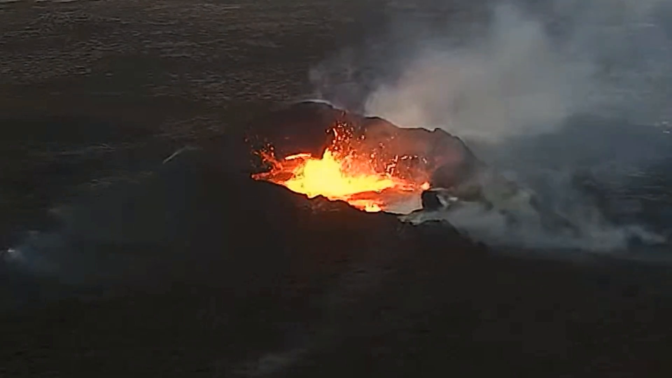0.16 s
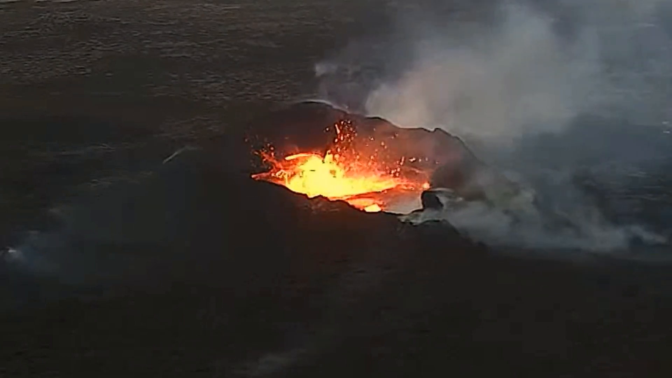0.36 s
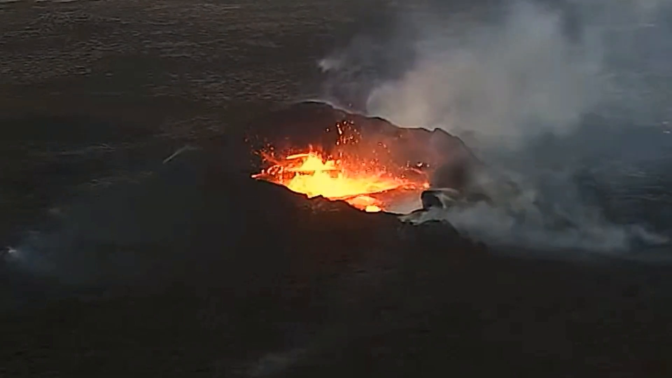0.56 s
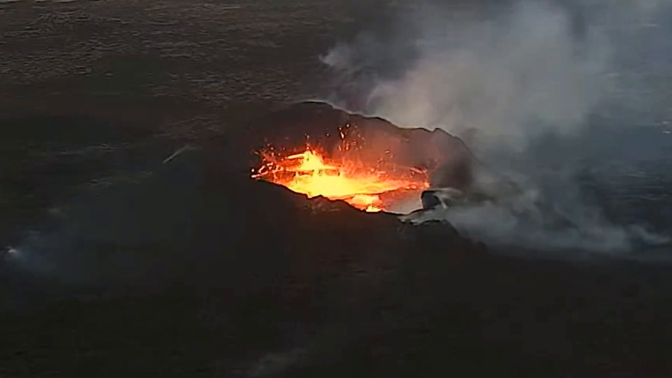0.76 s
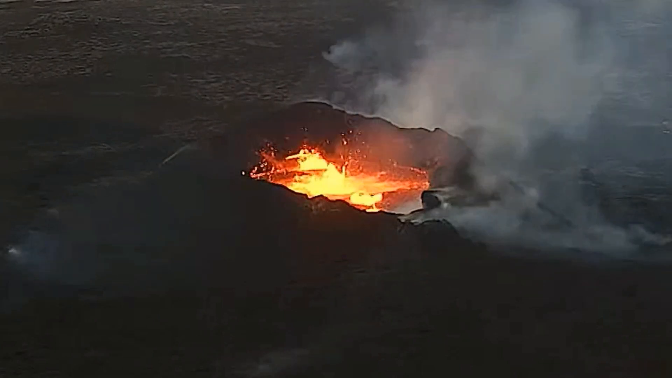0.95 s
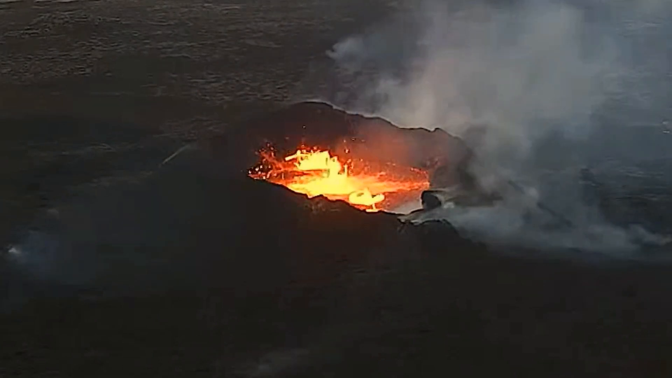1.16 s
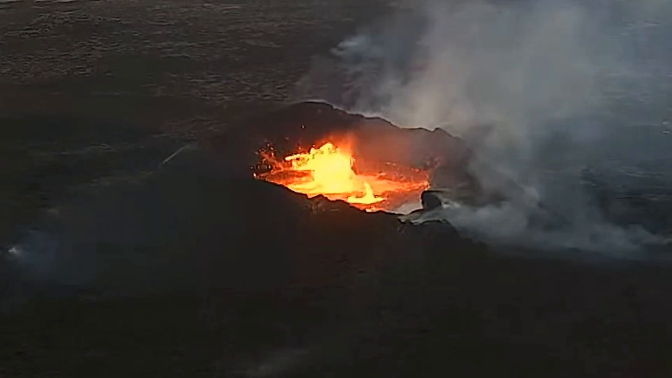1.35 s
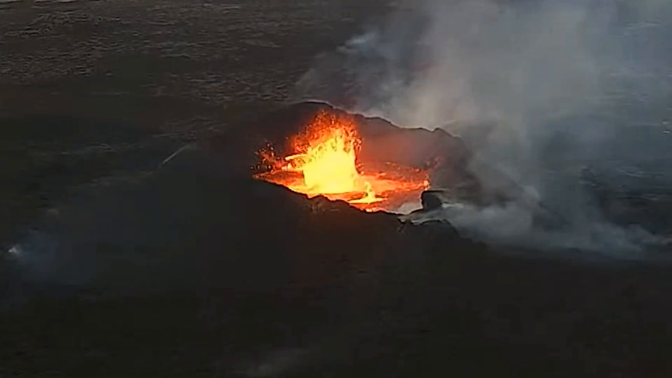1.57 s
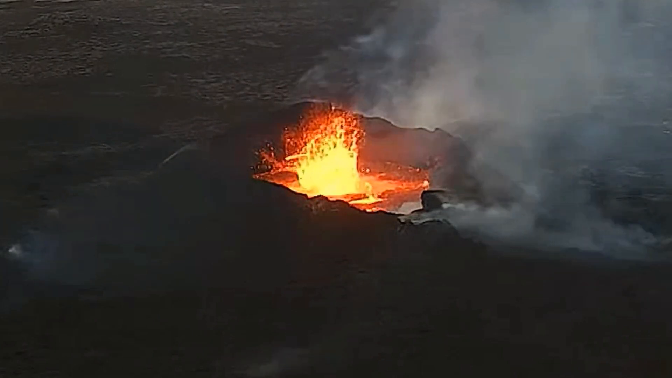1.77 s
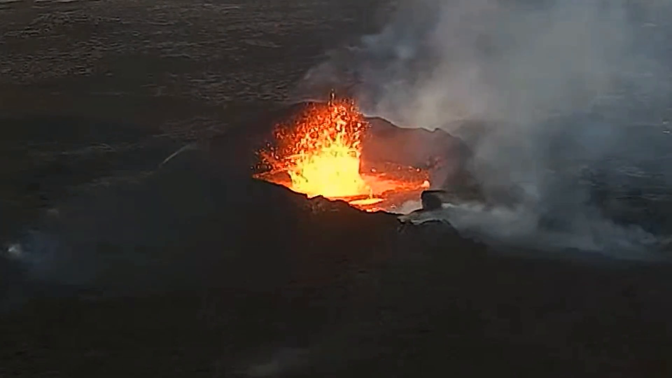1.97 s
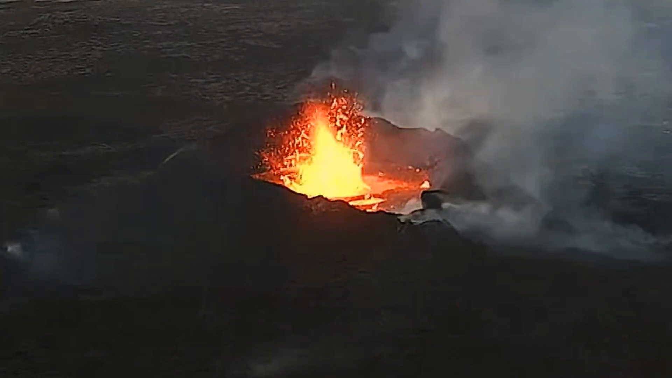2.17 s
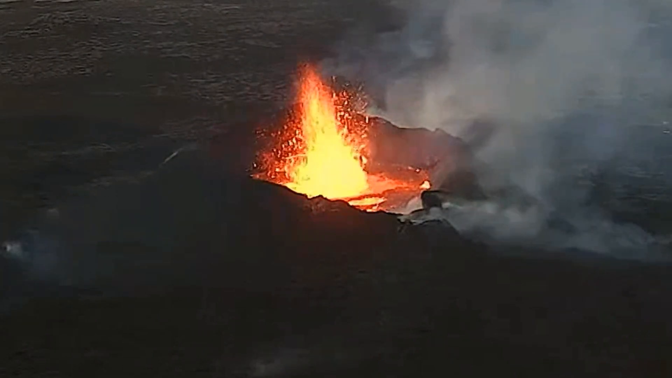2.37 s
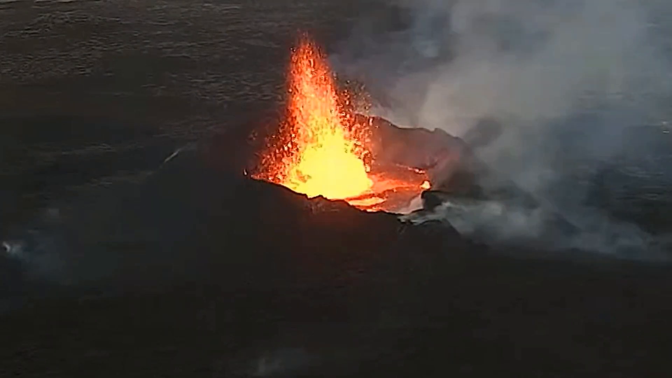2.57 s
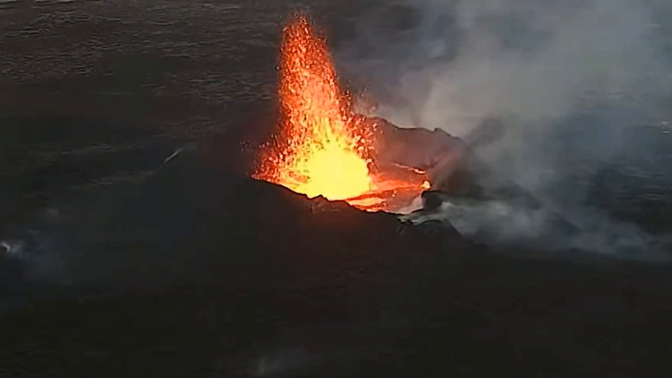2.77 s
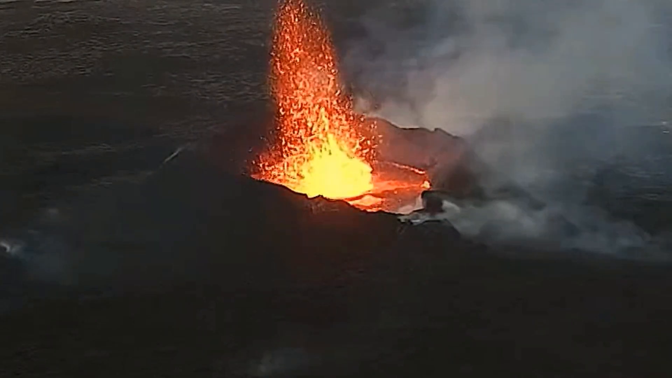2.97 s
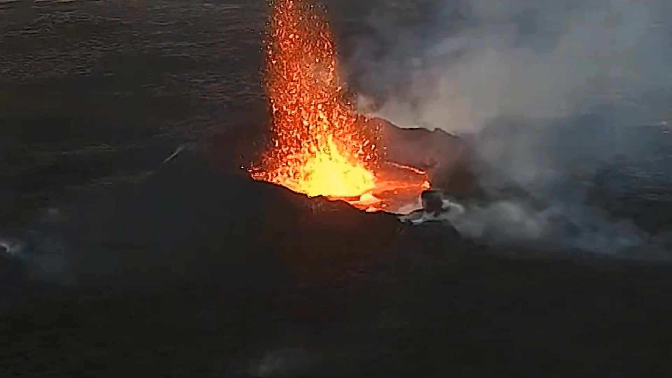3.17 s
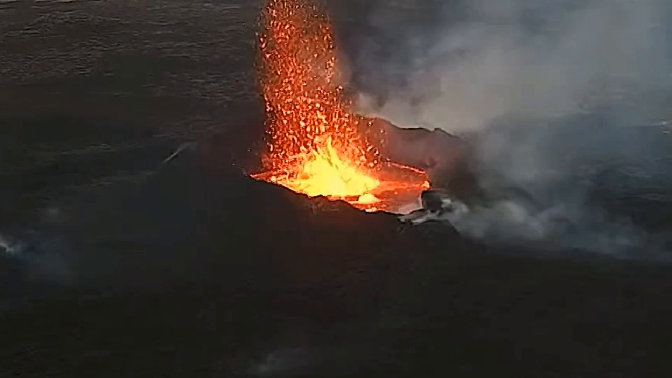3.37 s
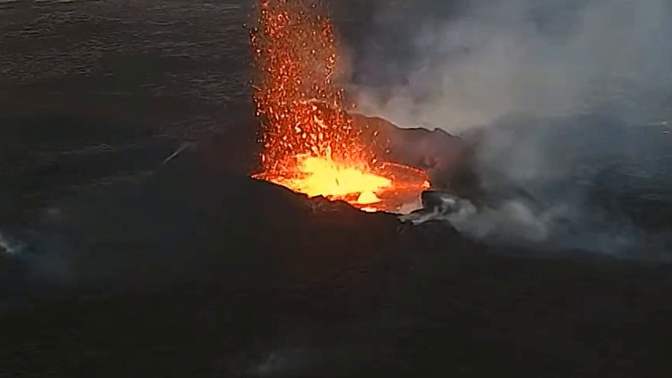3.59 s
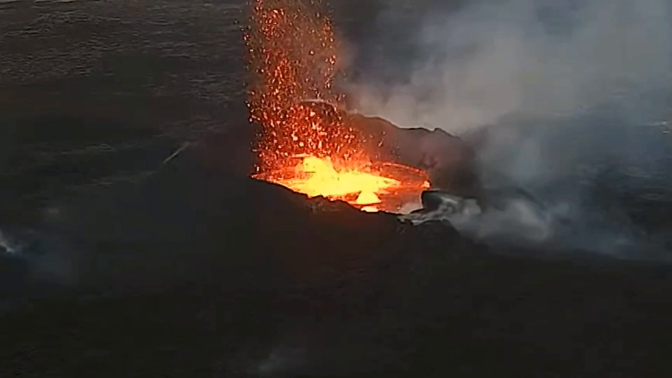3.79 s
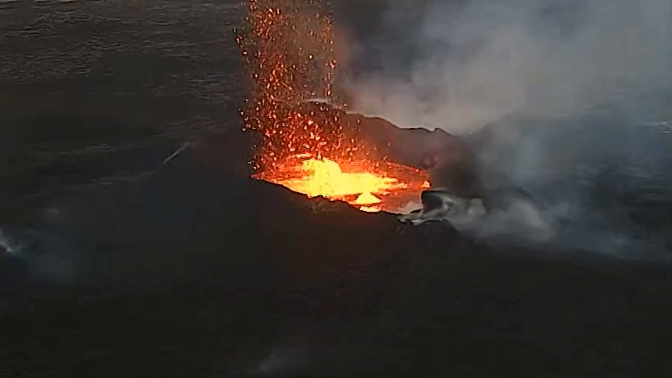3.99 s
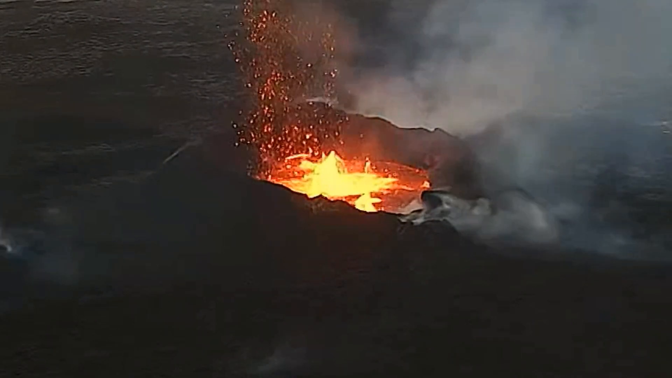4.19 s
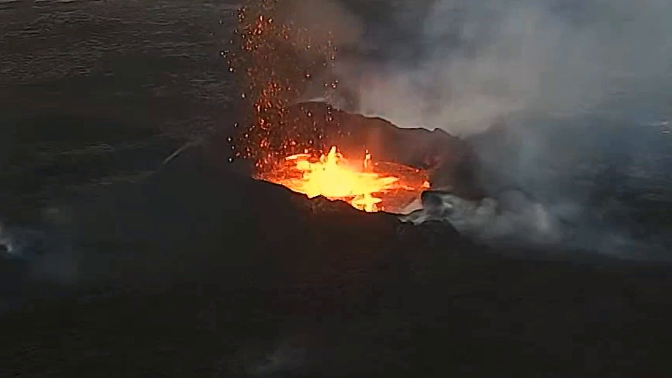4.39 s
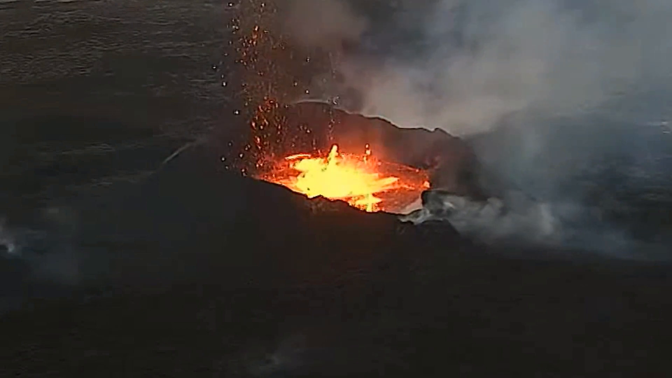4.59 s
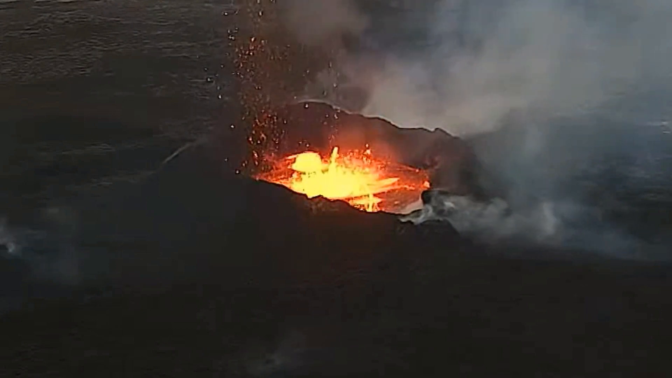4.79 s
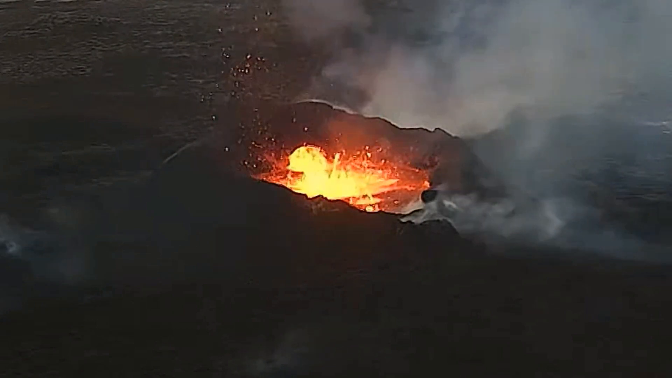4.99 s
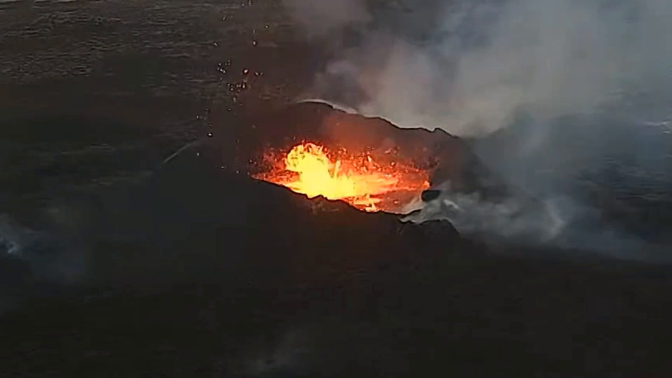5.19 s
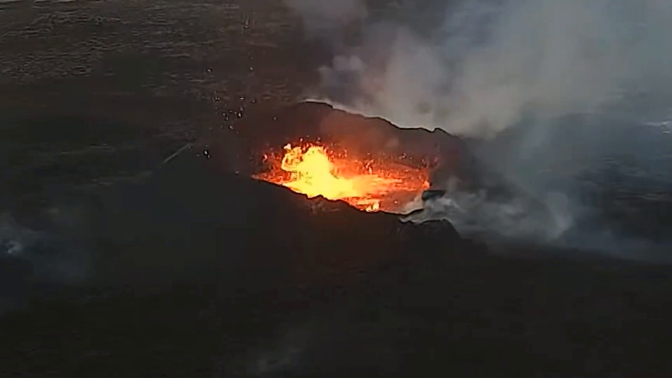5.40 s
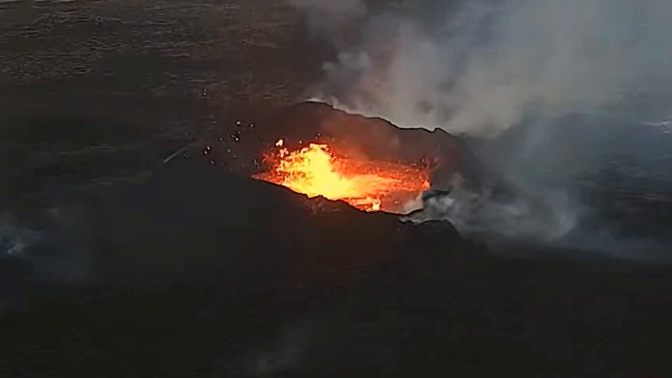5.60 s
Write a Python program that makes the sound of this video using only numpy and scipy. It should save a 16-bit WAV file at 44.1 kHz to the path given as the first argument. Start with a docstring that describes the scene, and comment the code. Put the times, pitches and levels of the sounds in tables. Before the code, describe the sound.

A lava lake churns far away in open country, heard in wide, diffuse stereo without sharp close detail. At first a low rumble and a few soft booms lie beneath rushing wind; wavering, breathy whistles glide over it until about 1 s, with a lower howl from 0.7 to 1.2 s. From 1 s a smooth hiss and hollow gush build, peaking near 1.9 s as booms cluster and the roar climbs, fully open by 2.2 s. Dull lava slaps land around 1.9, 2.5, 3.2 and 4.1 s. The deep rumble swells, with a very low, heavy boom at 2.75 s, while the hiss slowly dies away. Faint higher whistles return at 3.2-3.9 s, and a stronger lower howl wavers from 3.4 to 4.5 s. A dull wash of falling lava builds from 3.4 to 4.2 s and stays. Frequent muffled booms, roar and wind continue until the end, about 5.6 s, as the deepest rumble recedes.

```python
"""A lava lake churns in a crater and throws up a tall fountain, far off in open country.
Its bursting gas pockets boom as short swells of noise over a heaving rumble and a roar of shaped noise.
The fountain swells as a hiss with a hollow gush just behind; lava slaps down and rains back as a dull wash.
Wind rushes over the slopes as churning noise and twice rises to a wavering whistle, made of narrow
gliding noise, with a lower howl that begins later and outlasts it."""
import sys
import numpy as np
from scipy import signal
from scipy.fft import rfft, irfft, next_fast_len
from scipy.io import wavfile
from scipy.ndimage import uniform_filter1d

SR = 44100
rng = np.random.default_rng(int(sys.argv[2]) if len(sys.argv) > 2 else 0)


def wav_record(signal):
    """Record a signal, one row per channel, as 16-bit PCM in the file named by sys.argv[1]."""
    frames = np.transpose(np.atleast_2d(signal))
    bounded = np.clip(frames, -1, 1)
    # unit amplitude maps onto the largest positive 16-bit level
    quanta = np.round(bounded * 32767).astype(np.int16)
    wavfile.write(sys.argv[1], SR, quanta)


N = 249165  # length of the scene in samples


def from_db(db):
    """Turn decibels into a gain."""
    return 10 ** (np.asarray(db) / 20)


def rms_one(x):
    """Scale a sound to an average power of one."""
    return x / np.sqrt(np.mean(x ** 2) + 1e-20)


def in_time(rows):
    """Draw straight lines between the rows of a table: one curve for each column after the time."""
    s, *columns = np.transpose(rows)
    return [np.interp(np.arange(N) / SR, s, column) for column in columns]


def at_hz(points, hz):
    """Read a spectrum table on a log-frequency axis; it is silent beyond its ends."""
    known_hz, db = np.transpose(points)
    return np.interp(np.log(hz), np.log(known_hz), db, left=-200, right=-200)


def panned(x, left_db):
    """Lean a stereo sound to the left by a level difference in dB."""
    gains = np.array([from_db(left_db / 2), from_db(-left_db / 2)])
    return x * gains.reshape(2, -1)


def add(out, start_s, sound):
    """Mix a sound in from a given time, as far as it fits."""
    start = int(start_s * SR)
    first, last = max(start, 0), min(start + sound.shape[1], N)
    out[:, first:last] += sound[:, first - start:last - start]


def drift(rate):
    """Wander slowly at random with spread 1: noise through two equal low-pass stages at rate [Hz]."""
    r = np.exp(-80 * np.pi * rate / SR)  # one step lasts 40 samples
    noise = rng.standard_normal(N // 40 + 2002)
    slow = signal.lfilter([1], [1, -2 * r, r * r], noise)[2000:]  # drop the filter's start-up
    return np.interp(np.arange(N) / 40, np.arange(len(slow)), rms_one(slow))


def turbulence(colour, churn_db, churn_rate, alike):
    """Make stereo noise of unit power; eddies of each size (half-octave bands) swell and fade alone."""
    size = next_fast_len(N, real=True)
    hz = np.maximum(np.arange(size // 2 + 1) * SR / size, 1)
    shaped = rfft(rng.standard_normal((2, size))) * from_db(at_hz(colour, hz))
    edges = 14 * 2 ** (np.arange(20) / 2)
    out = np.zeros((2, N))
    for low, high in zip(edges, edges[1:]):
        swell = from_db(churn_db * drift(churn_rate))
        if high > colour[0][0] and low < colour[-1][0]:
            band = shaped * ((hz >= low) & (hz < high))
            out += irfft(band, size)[:, :N] * swell
    alike = np.clip(alike, -1, 1)  # 0: left and right unrelated, 1: the same
    mid = np.sqrt(1 + alike) * out[0]
    side = np.sqrt(1 - alike) * out[1]
    return rms_one(np.array([mid + side, mid - side]))


def sustained(x, span_s):
    """Even out the slow power of a noise, so that later level curves set the swells."""
    power = uniform_filter1d(np.mean(x ** 2, axis=0), max(int(span_s * SR), 2))
    return x / np.sqrt(power + 1e-12)


def narrow_noise(hz, width, steady_s):
    """Make a stereo noise band that glides with hz, up to 2 s long; width is a share of the mean pitch."""
    real, imaginary = rng.standard_normal((2, 2, 2 * SR))[..., :len(hz) + SR // 20]
    low_pass = signal.butter(3, width * np.mean(hz) / 2, fs=SR, output="sos")
    eddies = signal.sosfilt(low_pass, real + 1j * imaginary)[:, -len(hz):]
    carrier = np.exp(2j * np.pi * np.cumsum(hz) / SR)  # lifts the slow noise up to the pitch
    return sustained(np.real(eddies * carrier), steady_s)


def thuds(rows, rise_s, fall_s, width):
    """Make blows blurred by distance: each is a quick swell of noise around its own pitch."""
    t = np.arange(-SR // 4, SR // 4) / SR
    swell = np.exp(-(t / np.where(t < 0, rise_s, fall_s)) ** 2)
    out = np.zeros((2, N))
    for s, hz, db in rows:
        noise = narrow_noise(np.full(len(t), hz), width, steady_s=0.08)
        add(out, s + t[0], noise * swell * from_db(db))
    return out


# Moving air, before the fixed offsets and scaling in wind():
# (time [s], rush level [dB], fine hiss level [dB], lean to the left [dB])
AIR_CURVES = [(0, -43.5, -59, 5), (0.6, -43.5, -59.5, 2), (1.1, -44, -61.5, 2.5), (1.5, -43.5, -58.5, 4.5),
              (1.9, -39.5, -55, 5), (2.75, -40.5, -60.5, 2), (3.4, -41, -60.5, 1.5), (4.2, -42, -63, 1.5),
              (4.85, -43.5, -63.5, 1), (4.95, -42.5, -64.5, 0.5), (5.01, -44, -66, 1), (5.12, -44, -65, 1),
              (5.3, -46, -64, 0), (5.65, -44, -64, 0.5)]
# Tone colour of the rush: (frequency [Hz], relative level per Hz [dB])
RUSH_SPECTRUM = [(130, -19.5), (260, 1.5), (400, -1.5), (700, -1), (1000, -6.5), (1400, -24), (2200, -37),
                 (3500, -58)]
# Tone colour of the fine hiss: (frequency [Hz], relative level per Hz [dB])
FINE_SPECTRUM = [(700, -0.5), (1200, 4.5), (1600, -0.5), (2200, -8), (3000, -11), (3500, -17.5),
                 (4100, -28), (6000, -56.5)]


def wind():
    """Moving air tumbles over the slopes: a broad rush with a finer hiss on top."""
    rush_db, fine_db, left_db = in_time(AIR_CURVES)
    rush = turbulence(RUSH_SPECTRUM, churn_db=1.4, churn_rate=12, alike=0.031) * from_db(rush_db + 4.0)
    fine = turbulence(FINE_SPECTRUM, churn_db=1.6, churn_rate=32, alike=0.03) * from_db(fine_db + 12.5)
    return panned(rush, 0.54 * left_db) + panned(fine, left_db + 0.4)


WHISTLE_WIDTH = 0.12  # share of the pitch
WHISTLE_FADE_S, WHISTLE_STEADY_S = 0.029, 0.055
WHISTLE_WAVER, WHISTLE_WAVER_HZ = 0.01837, 25.55  # spread as a share of the pitch; rate limit
# Airy skirt: its centre as a share of the whistle's pitch, its width as a share of that centre,
# its level against the whistle
SKIRT_PITCH, SKIRT_WIDTH, SKIRT_DB = 0.68, 0.5, -5.5
# A howl at this pitch comes from straight ahead, higher whistles from further left
HOWL_HZ, LEFT_DB_PER_OCTAVE = 870, 6.5


def whistle(curve):
    """Eddies shed at an edge ring as a gliding, wavering noise band over a broad airy skirt."""
    s, hz, db = np.transpose(curve)
    t = np.arange(s[0], s[-1], 1 / SR)
    waver = WHISTLE_WAVER * drift(WHISTLE_WAVER_HZ)[:len(t)]
    pitch = np.interp(t, s, hz) * (1 + waver)
    fade = np.clip(np.minimum(t - s[0], s[-1] - t) / WHISTLE_FADE_S, 0, 1)
    core = narrow_noise(pitch, WHISTLE_WIDTH, WHISTLE_STEADY_S)
    skirt = narrow_noise(pitch * SKIRT_PITCH, SKIRT_WIDTH, WHISTLE_STEADY_S) * from_db(SKIRT_DB)
    tone = (core + skirt) * fade * from_db(np.interp(t, s, db))
    return panned(tone, LEFT_DB_PER_OCTAVE * np.log2(pitch / HOWL_HZ))


# Whistles and howls of the wind, one curve each, before waver, skirt, fades and lean:
# (time [s], pitch [Hz], level [dB])
WHISTLE_CURVES = [
    [(0.05, 1411, -62), (0.23, 1690, -48), (0.275, 1600, -58), (0.31, 1620, -47.5), (0.36, 1840, -42.5),
     (0.4, 1700, -49), (0.45, 1730, -44.5), (0.478, 1890, -46.5), (0.525, 1900, -53), (0.58, 1440, -43),
     (0.63, 1520, -54), (0.66, 1510, -46), (0.69, 1650, -50), (0.73, 1610, -51), (0.775, 1700, -43.5),
     (0.805, 1500, -54), (0.835, 1340, -45.5), (0.9, 1400, -48.5), (0.95, 1335, -42.5), (1.0, 1326, -67)],
    [(0.1, 1318, -53), (0.24, 1330, -51), (0.28, 1320, -44.5), (0.32, 1200, -55), (0.45, 1110, -48),
     (0.5, 1080, -52), (0.56, 1110, -48), (0.63, 1080, -50), (0.7, 1120, -50), (0.8, 1080, -52)],
    [(0.84, 1560, -61), (0.915, 1600, -54.5), (0.98, 1560, -60)],
    [(0.68, 745, -53), (0.73, 750, -41), (0.8, 740, -54), (0.87, 730, -51), (0.925, 725, -40),
     (0.98, 740, -42), (1.03, 782, -50), (1.08, 750, -46), (1.13, 750, -41), (1.2, 740, -55)],
    [(3.2, 1850, -61), (3.3, 2250, -56), (3.35, 2100, -63), (3.38, 2150, -52), (3.402, 2330, -49.5),
     (3.425, 2150, -57), (3.46, 2200, -56), (3.5, 2440, -52), (3.535, 2300, -56), (3.565, 2060, -53),
     (3.615, 1950, -61), (3.65, 2030, -56.5), (3.695, 2020, -60), (3.74, 2140, -53), (3.77, 2100, -65)],
    [(3.16, 1690, -61), (3.27, 1700, -53), (3.36, 1710, -60), (3.41, 1690, -60), (3.55, 1620, -62),
     (3.66, 1650, -57), (3.74, 1720, -68), (3.78, 1700, -58), (3.86, 1690, -56), (3.91, 1620, -63)],
    [(3.4, 880, -59), (3.5, 885, -50), (3.57, 900, -45), (3.66, 1000, -52), (3.72, 1050, -39),
     (3.78, 965, -42), (3.82, 1010, -41), (3.855, 1040, -50), (3.89, 1080, -40), (3.96, 975, -38.5),
     (4.04, 885, -40), (4.07, 930, -47), (4.11, 989, -42), (4.17, 930, -41.5), (4.25, 814, -45),
     (4.38, 835, -46), (4.5, 796, -60)],
]


def gusts():
    """Wind sheds eddies in two passages of whistles, each with a lower howl that outlasts them."""
    out = np.zeros((2, N))
    for curve in WHISTLE_CURVES:
        add(out, curve[0][0], whistle(curve))
    return out


FALLBACK_START_S, FALLBACK_BUILD_S, FALLBACK_DB = 3.42, 0.81, -46
# Tone colour of the lava raining back: (frequency [Hz], relative level per Hz [dB])
FALLBACK_SPECTRUM = [(280, -24.5), (350, -1), (430, -2.5), (540, -5.5), (700, -21)]


def fallback():
    """Clots of the fountain rain back into the crater: a dull, uneven wash that builds and stays."""
    since = np.arange(N) / SR - FALLBACK_START_S
    falling = np.clip(since / FALLBACK_BUILD_S, 0, 1)
    wash = turbulence(FALLBACK_SPECTRUM, churn_db=1.0, churn_rate=8.1, alike=0.03)
    return wash * falling * from_db(FALLBACK_DB)


# Big clots slapping down: (time of the peak [s], pitch [Hz], level [dB])
SPATTER_EVENTS = [(1.86, 468, -39), (2.52, 459, -37), (3.17, 500, -40), (3.99, 494, -53), (4.08, 456, -34),
                  (4.28, 1460, -53), (4.39, 1436, -48.5), (4.82, 1405, -53)]


def spatters():
    """Thrown lava slaps back down: short swells of noise, half as wide as their pitch."""
    return thuds(SPATTER_EVENTS, rise_s=0.017, fall_s=0.017, width=0.5)


JET_START_S, JET_ATTACK_S, JET_HOLD_S, JET_FALL_DB_PER_S = 1.043, 0.84, 0.3, 9
JET_PEAK_DB, JET_IDLE_DB = -62.5, -82.5  # before the fixed boosts in fountain()


def jet_strength(lag_s):
    """The gas jet builds steadily, holds briefly and dies away evenly towards an idle leak."""
    since = np.arange(N) / SR - JET_START_S - lag_s
    attack = np.clip(since / JET_ATTACK_S, 0, 1)
    release_db = JET_FALL_DB_PER_S * np.maximum(since - JET_ATTACK_S - JET_HOLD_S, 0)
    return np.hypot(attack * from_db(JET_PEAK_DB - release_db), from_db(JET_IDLE_DB))


GUSH_SURGE_DB, GUSH_SURGE_S = 2.5, 0.099  # the lava surges as the jet breaks free
# Tone colour of the jet's hiss: (frequency [Hz], relative level per Hz [dB])
JET_SPECTRUM = [(1200, -10), (2200, 7.5), (3200, 8.5), (4200, -1), (5300, -2), (6200, -12), (7400, -13),
                (8200, -21), (9200, -38.5)]
# Tone colour of the gushing lava: (frequency [Hz], relative level per Hz [dB])
GUSH_SPECTRUM = [(140, -25.5), (210, -4), (260, 0), (350, -7), (550, -5.5), (900, -13), (1800, -32.5)]


def fountain():
    """Gas jets out with a smooth hiss, the lava gushes just behind; both surge as the jet breaks free."""
    since_peak = np.arange(N) / SR - JET_START_S - JET_ATTACK_S
    surge_db = GUSH_SURGE_DB * np.exp(-(since_peak / GUSH_SURGE_S) ** 2)
    hiss = turbulence(JET_SPECTRUM, churn_db=1.1, churn_rate=25, alike=0.0)
    hiss = hiss * from_db(10.0 + 0.89 * surge_db)
    gush = turbulence(GUSH_SPECTRUM, churn_db=1.0, churn_rate=54, alike=0.052)
    gush = gush * from_db(25.0 + surge_db)
    hiss = panned(hiss, left_db=2.0) * jet_strength(lag_s=0)
    gush = panned(gush, left_db=4.5) * jet_strength(lag_s=0.034)
    return hiss + gush


# The roar climbs as the vent opens; the slow sag counts from the start of the opening
ROAR_IDLE_DB, ROAR_OPEN_DB, ROAR_SAG_DB_PER_S = -35.5, -27.5, 0.44
VENT_OPENS_S, VENT_OPENING_S = 1.75, 0.46
# Slow heave of the lake, heard in the deep rumble: (time [s], level [dB])
HEAVE_CURVE = [(0.13, -30), (0.3, -36), (0.7, -39), (1.1, -43), (1.55, -40.5), (1.85, -39), (2.05, -35),
               (2.75, -28), (3.4, -29.5), (3.9, -28.5), (4.4, -34.5), (4.8, -43.5), (5.2, -39.5),
               (5.65, -40)]
# Tone colour of the rumble: (frequency [Hz], relative level per Hz [dB])
RUMBLE_SPECTRUM = [(14, -3), (26, -4), (40, -3.5), (58, 3), (75, -4.5), (100, -20), (140, -40)]
# Tone colour of the roar: (frequency [Hz], relative level per Hz [dB])
ROAR_SPECTRUM = [(40, -23), (62, -5), (85, 1.5), (120, -2), (165, -6), (240, -11.5), (340, -19.5),
                 (700, -37.5)]


def vent():
    """The lake heaves with a deep rumble; small gas pockets churn it into a roar."""
    since = np.arange(N) / SR - VENT_OPENS_S
    opening = np.clip(since / VENT_OPENING_S, 0, 1)
    roar_rise_db = ROAR_OPEN_DB - ROAR_IDLE_DB - ROAR_SAG_DB_PER_S * since
    roar_db = ROAR_IDLE_DB + opening * roar_rise_db
    rumble_db, = in_time(HEAVE_CURVE)
    rumble = turbulence(RUMBLE_SPECTRUM, churn_db=-0.7, churn_rate=1.6, alike=0.038)
    roar = turbulence(ROAR_SPECTRUM, churn_db=1.5, churn_rate=7.8, alike=0.077)
    rumble = sustained(rumble, span_s=0.69) * from_db(rumble_db)
    return rumble + sustained(roar, span_s=0.092) * from_db(roar_db)


# The largest gas pockets bursting: (time of the peak [s], pitch [Hz], level [dB])
BURST_EVENTS = [(0.12, 61.7, -33), (0.33, 80, -40), (0.58, 100.8, -30), (0.68, 116.8, -42),
                (1.78, 265, -32.5), (1.89, 165.2, -29), (1.92, 280, -35.5), (1.95, 87.4, -24),
                (2.03, 54.6, -29), (2.19, 63, -33), (2.455, 94.6, -28.5), (2.54, 56.4, -28.5),
                (2.68, 76.1, -32), (2.75, 40.3, -19.5), (2.81, 64.3, -31), (2.96, 84.6, -32),
                (3.28, 130.2, -28), (3.44, 58.2, -29), (3.85, 134.2, -28.5), (3.96, 128.4, -22),
                (4.02, 184.9, -29.5), (4.18, 86, -25.5), (4.365, 127, -24.5), (4.54, 66.7, -27.5),
                (4.62, 113.4, -28), (4.79, 119.2, -28.5), (4.83, 230, -34.5), (5.04, 134.3, -27),
                (5.13, 89.4, -25.5), (5.17, 55.1, -32.5), (5.37, 113, -34.5), (5.43, 80.3, -32),
                (5.51, 114.6, -31), (5.63, 80, -30)]


def bursts():
    """Large gas pockets burst with a boom: short swells of low noise, 0.45 of their pitch wide."""
    return thuds(BURST_EVENTS, rise_s=0.029, fall_s=0.032, width=0.45)


def scene():
    """Wind, falling lava, fountain and churning lake add up, all wide and diffuse."""
    air = wind() + gusts()
    falling_lava = fallback() + spatters()
    lake = vent() + bursts()
    return air + falling_lava + fountain() + lake


FAINT_HISS_DB, CUTOFF_HZ = -99, 15400


def record(dry):
    """A very faint, even hiss lies under everything; short fades avoid clicks, the top is cut steeply."""
    hiss = from_db(FAINT_HISS_DB) * rng.standard_normal((2, N))
    to_nearest_end = np.minimum(np.arange(N), N - np.arange(N))
    ends = np.minimum(to_nearest_end / (0.002 * SR), 1)
    top_cut = signal.ellip(8, 0.2, 70, CUTOFF_HZ, fs=SR, output="sos")
    return signal.sosfilt(top_cut, (dry + hiss) * ends)


dry = scene()
out = record(dry)
wav_record(out)
```